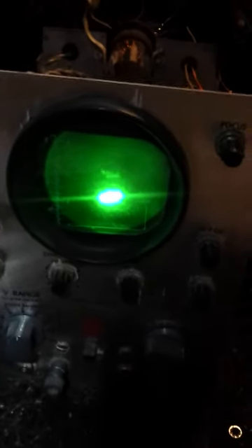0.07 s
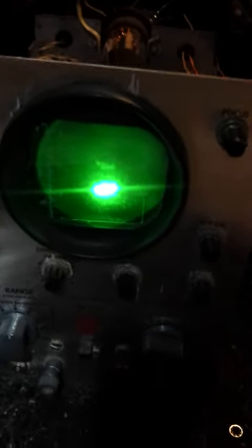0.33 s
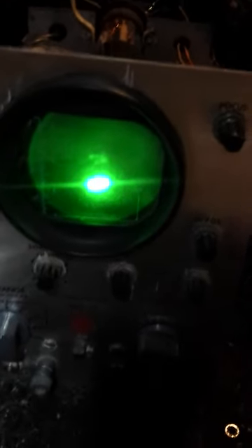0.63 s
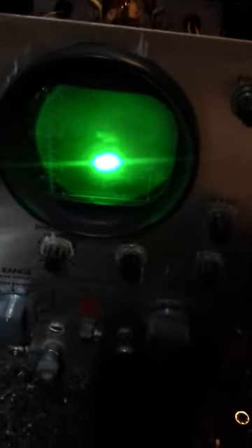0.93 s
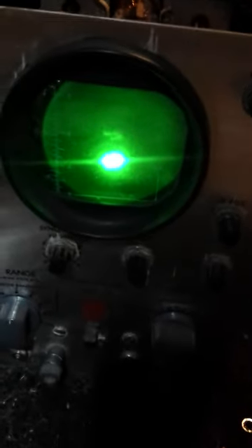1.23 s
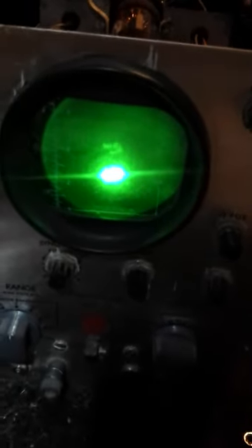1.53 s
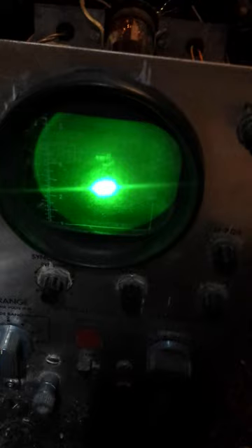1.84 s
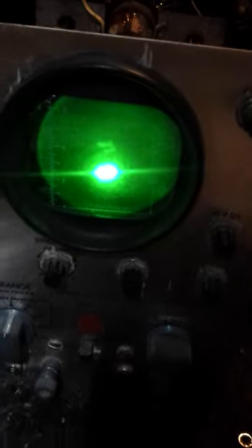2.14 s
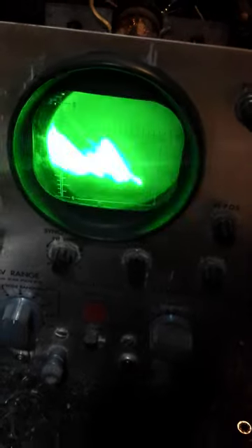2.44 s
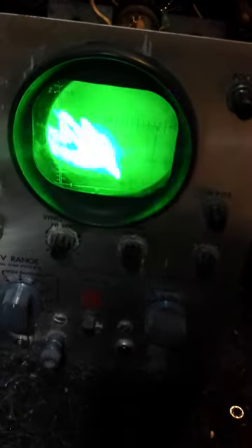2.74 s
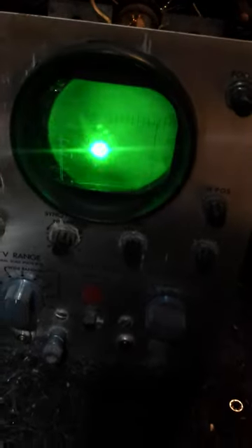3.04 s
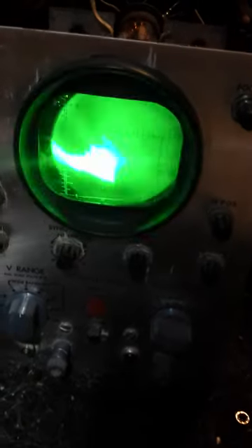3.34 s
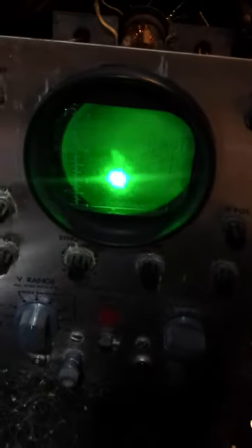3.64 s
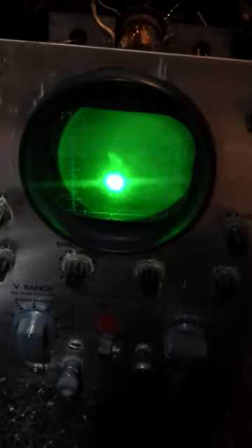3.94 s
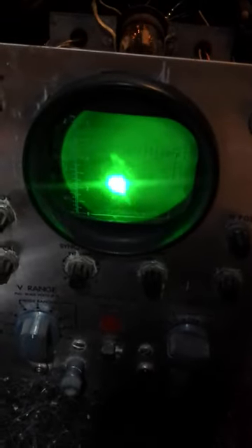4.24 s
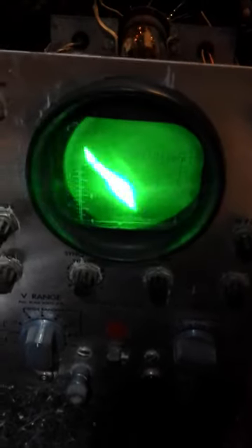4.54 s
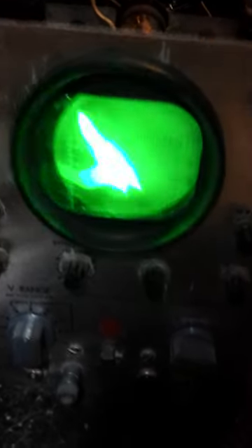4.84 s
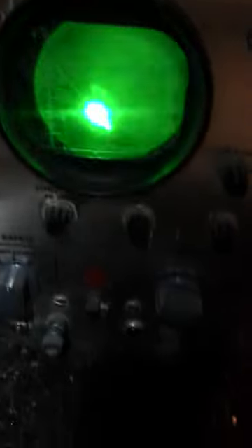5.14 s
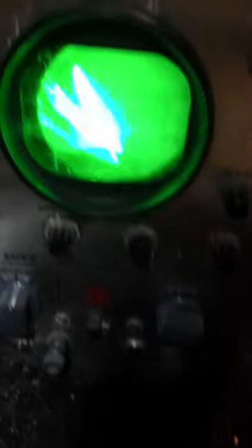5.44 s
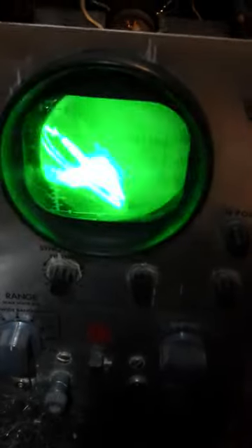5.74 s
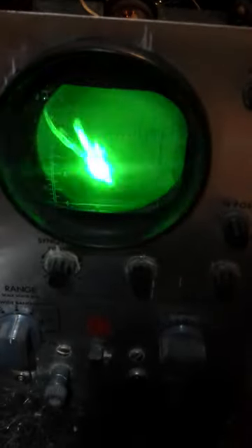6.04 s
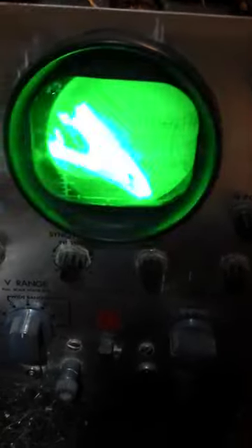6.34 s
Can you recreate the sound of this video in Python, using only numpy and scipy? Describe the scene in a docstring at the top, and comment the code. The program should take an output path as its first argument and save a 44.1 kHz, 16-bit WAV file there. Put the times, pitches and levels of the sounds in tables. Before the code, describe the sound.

A homemade high-voltage rig runs in a workshop, heard in stereo from a close hand-held microphone. Transformers hum low and a cooling blower drones and rushes, with a faint, thin whistle on top. A few small sparks snap and hollow ticks come from the microphone casing. Then gritty corona sizzle flares up four times, with sharper, more frequent spark snaps over the unbroken hum.

```python
"""A homemade high-voltage rig hums in a workshop, heard in stereo from close to its oscilloscope.
The transformers hum on the mains while a cooling blower drones, rushes and shakes the chassis.
Corona sizzles and flares up four times, small sparks snap, and the supply whistles thinly.
The microphone is hand-held, and a few hollow ticks come from its own casing."""
import sys
import numpy as np
from scipy import signal
from scipy.fft import rfft, irfft, next_fast_len
from scipy.io import wavfile

SR = 44100
rng = np.random.default_rng(int(sys.argv[2]) if len(sys.argv) > 2 else 0)


def store_pcm(level_fs):
    """Save levels as 16-bit WAV."""
    pcm = np.round(np.clip(level_fs, -1, 1) * 32767).astype(np.int16)
    wavfile.write(sys.argv[1], SR, np.atleast_2d(pcm).T)


N = 281358
TIME = np.arange(N) / SR
HZ = np.maximum(np.fft.rfftfreq(N, 1 / SR), 1)

# The loud sparks. Each row: start in seconds, relative levels of the burst and the direct crack in dB.
LOUD_SPARKS = [(0.184, -12, -4.5), (0.340, -20, -9), (0.601, -16, -20), (1.1648, -18, -7.5),
               (2.3955, -12, -20), (3.0663, -3, -6), (4.280, -13, -12), (4.3804, -3.5, -4),
               (4.647, -4.5, -11), (4.7699, -3.5, -2.5), (5.0029, -4, -4), (5.3154, -1.5, 0),
               (5.503, -6.5, -4.5), (6.1331, -5.5, -3), (6.3075, -5.5, -3), (6.3363, -8, -12)]


def hum(mains_hz=60.0, rotor_hz=52.97, blades=4, faint_db=(-76.5, -83)):
    """Transformers hum on the mains, the blower on its rotor, and the two mix into sum tones."""
    # The rig's tones. Each row: mains multiple, rotor multiple, left and right dB, left lead in radians.
    tones = [(2, 0, -41.5, -43.5, .1), (4, 0, -49, -51, .2), (12, 0, -71, -64.5, 0), (17, 0, -64, -57.5, 0),
             (0, 3, -48, -51, .2), (0, 4, -53, -56, .5), (0, 5, -60, -62, .3), (2, 1, -49, -52, .1),
             (4, 1, -48.5, -56, 1), (6, 1, -65, -73, -.8), (19, 1, -71, -71, 1.1), (2, 2, -57, -60, .2),
             (4, 2, -59, -67, -.4), (4, 3, -65, -77, -.2), (2, 4, -49, -69, .9), (4, 4, -61, -70, 1.6),
             (6, 4, -70, -63, -1), (8, 4, -62, -57, -.2), (2, 8, -68, -66, -2.2), (4, 8, -70, -65, .2),
             (8, 8, -67, -64, .2), (12, 8, -68, -66, 1.6), (14, 16, -64, -76, -.1),
             (20, 12, -67, -73, -1.2)]
    # Other machines in the workshop. Each row: pitch in Hz, left and right level in dB.
    drones = [(59.1, -65, -67.5), (92.4, -55, -56.5)]
    mains_turn, rotor_turn = rng.random(2)
    # The blades also beat faintly with the pull of the mains.
    beats = {(mains, blades * k) for mains in range(6, 19, 2) for k in range(1, 5)}
    beats -= {row[:2] for row in tones}
    faint_tones = [(*beat, *faint_db) for beat in sorted(beats)]
    out = sum(tone(hz, rng.random(), *voice) for hz, *voice in drones)
    for mains, rotor, *voice in tones + faint_tones:
        # Blade tones keep step with mains and rotor, so neighbouring ones throb together.
        turn = rng.random() if rotor % blades else mains * mains_turn + rotor * rotor_turn
        out += tone(mains * mains_hz + rotor * rotor_hz, turn, *voice)
    return out


def tone(hz, turn, left_db, right_db, lead=0, waver=0.036, waver_per_khz=0.33, waver_hz=1.05):
    """A held tone; higher ones waver more, as the microphone sways through their standing waves."""
    depth = waver + waver_per_khz * hz / 1e3
    wander = 1 + depth * (drift(waver_hz) + 1j * drift(waver_hz))
    wave = wander / np.sqrt(.5 + depth ** 2) * np.exp(2j * np.pi * (hz * TIME + turn))
    return sides(left_db, right_db) * np.real([wave * np.exp(1j * lead), wave])


def panels(swell_share=0.67):
    """The blower's turbulence keeps each mode of the chassis panels droning unevenly."""
    # Each row: pitch and width in Hz, left and right level in dB, likeness of the sides from 0 to 1.
    modes = [(99.8, 7.3, -59, -63, 1), (125.3, 2.6, -63, -66.5, 0.86), (147.4, 3.2, -45.5, -48.5, 1),
             (163.5, 6.8, -52, -54.5, 0.94), (184.2, 6, -48, -49, 0.97), (207, 3.9, -57, -62.5, 1),
             (253.4, 5.1, -57.5, -65.5, 0.9), (296.7, 7.3, -54, -63, 0.87), (390, 34, -61, -68, 0.53),
             (709, 54, -60.5, -59.5, 1), (1040, 28, -66, -63.5, 0.65), (1666, 86, -57.5, -68.5, 0.25),
             (1818, 46, -60.5, -70, 0)]
    # The drone's slow swing, of which the panels follow a share. Each row: time in seconds, level in dB.
    swell = [(0.1, -38.5), (0.39, -43), (2.27, -38), (3.08, -45), (3.18, -40.5), (3.37, -39), (4.31, -44.5),
             (6.25, -41)]
    out = 0
    for hz, width, left_db, right_db, alike in modes:
        resonance = 1 / (1 + ((HZ - hz) / (1.5 * width)) ** 2) ** 2
        out += sides(left_db, right_db) * rms_one(irfft(stereo_noise(alike) * resonance, N))
    swell_db = np.interp(TIME, *np.transpose(swell))
    return out * from_db(swell_share * (swell_db - swell_db.mean()))


def corona_strength(idle_db=-15, attack_s=0.13, release_s=0.27, flicker_db=1.0, flicker_hz=22):
    """The corona's flickering level: each flare rises, holds and dies away over a faint idle sizzle."""
    # Each row: start in seconds, seconds until it begins to fade, relative level in dB.
    flares = [(2.336, 0.53, -1.8), (3.155, 0.24, -3), (4.364, 0.62, -6), (5.294, 0.64, -1.5)]
    power = from_db(idle_db) ** 2
    for start, hold, level_db in flares:
        attack = np.clip((TIME - start) / attack_s, 0, 1)
        release = np.exp(-np.maximum(TIME - start - hold, 0) / release_s)
        power += (from_db(level_db) * attack * release) ** 2
    return np.sqrt(power) * from_db(flicker_db * drift(flicker_hz))


def spark_bursts(strength, faint_per_s=3.8, faint_db=-17):
    """One impulse a spark: the loud ones, and faint ones that come more often as the corona grows."""
    times, bursts_db, _ = np.transpose(LOUD_SPARKS)
    faint = rng.random(N) < faint_per_s * strength / SR
    return clicks(times, bursts_db) + from_db(faint_db) * faint


def discharges(strength, sparks, grit_db=3, spark_db=17, spark_t60=0.042, room_db=4, room_t60=0.54):
    """Corona is a gritty sizzle; a spark is a burst of the same colour, with a short tail from the room."""
    # The colour of a discharge. Each row: frequency in Hz, left and right density in dB per Hz.
    spectrum = [(2000, -107, -106), (3750, -88, -98), (5100, -89, -90.5), (6240, -83.5, -104),
                (6340, -94.5, -92.5), (8400, -93.5, -88), (10800, -101, -93), (14500, -103, -98.5)]
    grit = rms_one(from_db(grit_db * drift(rate_hz=400)))
    power = (strength * grit) ** 2
    for level_db, t60 in ((spark_db, spark_t60), (room_db, room_t60)):
        fade = from_db(-120 / (t60 * SR))  # power kept from one sample to the next
        power += from_db(level_db) ** 2 * signal.lfilter([1], [1, -fade], sparks ** 2 + 1e-18)
    high_pass = 1 / (1 + (3000 / HZ) ** 4)
    return colour(stereo_noise(0) * high_pass, spectrum) * np.sqrt(power)


def snaps(bounce_s=.0023, bounce_db=-12, lowest_hz=4000):
    """Each loud spark's direct crack and one near reflection ring briefly in the microphone ports."""
    # Each row: pitch in Hz, t60 in seconds, left and right peak in dB ahead of the low cut.
    ports = [(5610, 0.0017, -23, -48), (8600, 0.0011, -39, -37), (12100, 0.001, -46, -37)]
    times, _, levels_db = np.transpose(LOUD_SPARKS)
    blows = clicks(times, levels_db) + clicks(times + bounce_s, levels_db + bounce_db)
    out = 0
    for hz, t60, left_db, right_db in ports:
        crack = ring(ring(blows, hz, t60), hz, t60)
        out += sides(left_db, right_db) * crack / np.abs(crack).max()
    return signal.sosfilt(signal.butter(4, lowest_hz, "high", fs=SR, output="sos"), out)


def casing(treble_above_hz=1500, contact_hz=7000):
    """Ticks ring the microphone's casing: a sharp click on the left, a hollow knock on the right."""
    # Each row: start in seconds, level in dB, extra treble in dB, ring pitch as a ratio.
    ticks = [(1.0518, -2, -0.5, 1.03), (1.0906, -8, -3.5, 0.99), (1.1172, -11.5, -6, 0.96),
             (1.160, -13, -5, 1.0), (1.501, -9.5, -7, 1.0), (1.5835, -15, -6, .96),
             (2.214, -0.6, -0.5, .99), (4.6297, -1.5, -0.5, 1.01), (4.742, -17, -7, 1.07),
             (5.328, -16, -3, 0.93), (5.479, -16.5, 1, 1.1)]
    # Each row: pitch in Hz, t60 in seconds, left and right gain in dB, starting direction as +1 or -1.
    modes = [(460, 0.015, -35.5, -21.5, 1), (780, 0.019, -37, -12, -1), (904, 0.015, -47, -12, 1),
             (1240, 0.019, -44, -34.5, 1), (1855, 0.0063, -22, -27, 1), (2330, 0.0039, -23.5, -60, -1),
             (3700, 0.0045, -34, -28, -1), (4000, 0.0034, -22, -47, -1), (5420, 0.003, -20, -36, -1),
             (7254, 0.0037, -31.5, -30, -1)]
    out = np.zeros((2, N))
    blow = signal.unit_impulse(SR // 20)
    for start_s, level_db, treble_db, pitch in ticks:
        start = int(start_s * SR)
        for hz, t60, left_db, right_db, direction in modes:
            gain = direction * from_db(level_db + treble_db * (hz > treble_above_hz))
            ringing = ring(blow, hz * pitch, t60)
            out[:, start:start + len(blow)] += gain * sides(left_db, right_db) * ringing
    return signal.sosfilt(signal.butter(2, contact_hz, fs=SR, output="sos"), disperse(out))


def disperse(x, hz=2800, width_hz=2200):
    """Bending waves cross the casing at unequal speeds, smearing a click but keeping its colour."""
    radius = np.exp(-np.pi * width_hz / SR)
    poles = [1, -2 * radius * np.cos(2 * np.pi * hz / SR), radius ** 2]
    return signal.lfilter(poles[::-1], poles, x + 1e-18)


def air(split_hz=2700):
    """The blower's air rushes low down and gives way to smooth hiss higher up."""
    # Each row of both: frequency in Hz, left and right density in dB per Hz.
    rush = [(30, -97, -96), (52, -84, -82), (91, -75.5, -76.5), (182, -69.5, -70.5), (246, -73.5, -75.5),
            (396, -75, -79), (493, -81, -81), (686, -87, -79), (1190, -85.5, -83), (1500, -84.5, -90),
            (1990, -88, -90), (2720, -92, -89.5)]
    hiss = [(2700, -89.5, -88.5), (3540, -90.5, -89.5), (4520, -87.5, -90.5), (5130, -86, -86),
            (5500, -84.5, -87), (6600, -90.5, -88.5), (8860, -100, -92.5), (10500, -103, -91.5),
            (11300, -103, -91.5), (12200, -104, -93.5), (15500, -103, -104.5)]
    # Diffuse sound at the microphone. Each row: frequency in Hz, likeness of the sides from 0 to 1.
    likeness = [(40, 0.76), (200, 0.99), (330, 0.3), (550, 0.04), (740, 0.7), (1000, 0.3), (1300, 0),
                (3000, 0.2), (6000, 0)]
    noise = stereo_noise(at_hz(likeness))
    low = colour(noise * (HZ < split_hz), rush)
    high = colour(noise * (HZ >= split_hz), hiss)
    return low + bench(high, echo_gain=0.16)


def whistles():
    """The high-voltage supply whistles, thin and unsteady, at the top of the hiss."""
    # Each row: pitch and width in Hz, left and right level in dB.
    bands = [(10500, 66, -95, -77), (11260, 70, -83, -73.5)]
    out = 0
    for hz, width, left_db, right_db in bands:
        resonance = 1 / (1 + ((HZ - hz) / width) ** 2)
        out += sides(left_db, right_db) * rms_one(irfft(stereo_noise(0) * resonance, N))
    return out


def bench(x, echo_gain, nearest_s=.002, farthest_s=.025, count=8):
    """Weak reflections from the gear nearby, other ones on each side, comb the sound finely."""
    out = x.copy()
    for side in range(2):
        for lag in (rng.uniform(nearest_s, farthest_s, count) * SR).astype(int):
            out[side, lag:] += echo_gain * rng.choice([-1, 1]) * x[side, :N - lag]
    return out / np.sqrt(1 + count * echo_gain ** 2)


def ring(x, hz, t60):
    """A unit click sets a sine of height one ringing."""
    radius, angle = from_db(-60 / (t60 * SR)), 2 * np.pi * hz / SR
    return signal.lfilter([0, np.sin(angle)], [1, -2 * radius * np.cos(angle), radius ** 2], x + 1e-18)


def clicks(times, levels_db):
    """Single-sample blows."""
    out = np.zeros(N)
    out[(times * SR).astype(int)] = from_db(levels_db)
    return out


def drift(rate_hz, hop=16):
    """A smooth random wander with a spread of one."""
    steps = next_fast_len(N // hop + 2)
    low_pass = 1 / (1 + (np.fft.rfftfreq(steps, hop / SR) / rate_hz) ** 2)
    slow = irfft(rfft(rng.standard_normal(steps)) * low_pass, steps)
    return np.interp(TIME, np.arange(steps) * hop / SR, rms_one(slow))


def stereo_noise(alike):
    """Spectra of two partly alike white noises."""
    mid, side = rfft(rng.standard_normal((2, N)))
    return np.sqrt((1 + alike) / 2) * mid + np.sqrt((1 - alike) / 2) * side * [[1], [-1]]


def colour(spectra, rows):
    """Give unit white noise the left and right densities of a table."""
    density = from_db([at_hz(rows, column=1), at_hz(rows, column=2)])
    return irfft(spectra * density, N) * np.sqrt(SR / 2)


def at_hz(rows, column=1):
    """Read a spectrum column on a log-frequency axis."""
    rows = np.array(rows)
    return np.interp(np.log(HZ), np.log(rows[:, 0]), rows[:, column])


def sides(left_db, right_db):
    """Gains for the left and right channel."""
    return from_db([[left_db], [right_db]])


def from_db(db):
    """Decibels to gain."""
    return 10 ** (np.asarray(db) / 20)


def rms_one(x):
    """Scale to unit power."""
    return x / np.sqrt(np.mean(x ** 2) + 1e-20)


def scene():
    """The running rig and its discharges from close by, with ticks right at the microphone."""
    strength = corona_strength()
    sparks = spark_bursts(strength)
    rig = hum() + panels() + air() + whistles()
    crackle = bench(discharges(strength, sparks) + snaps(), echo_gain=0.048)
    return rig + crackle + casing()


def record(dry, cutoff_hz=14600):
    """The top is cut steeply."""
    return signal.sosfilt(signal.ellip(12, .1, 80, cutoff_hz, fs=SR, output="sos"), dry)


dry = scene()
out = record(dry)
store_pcm(out)
```